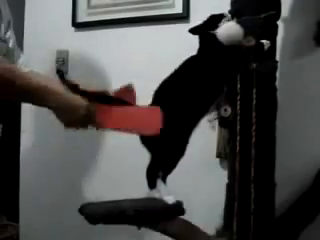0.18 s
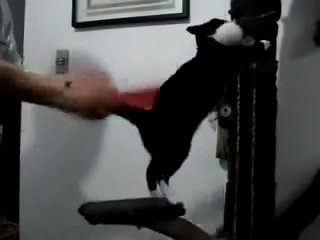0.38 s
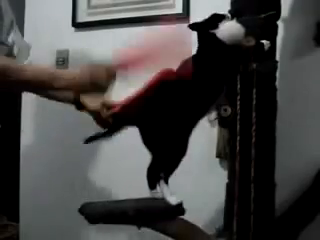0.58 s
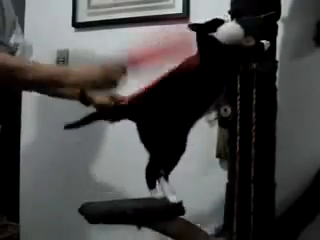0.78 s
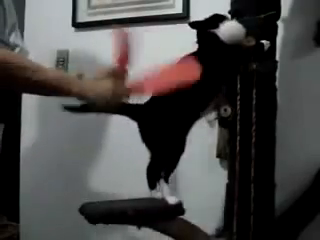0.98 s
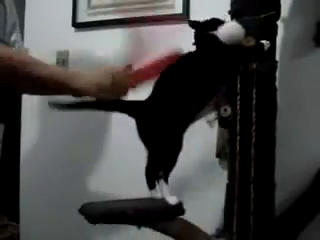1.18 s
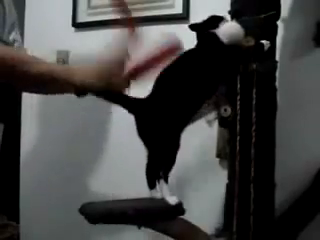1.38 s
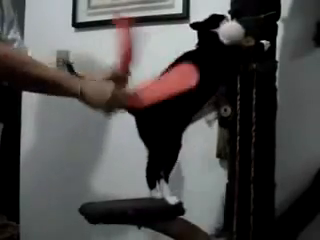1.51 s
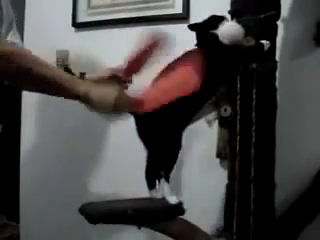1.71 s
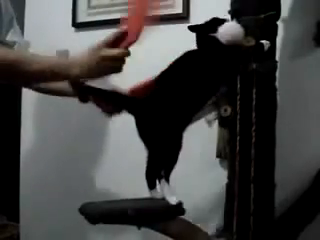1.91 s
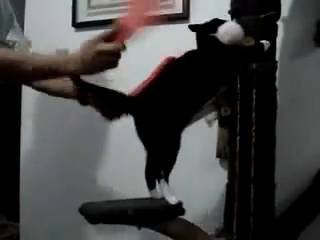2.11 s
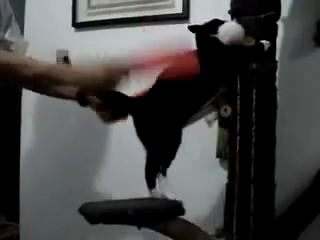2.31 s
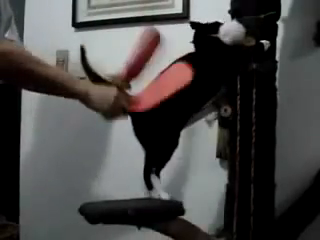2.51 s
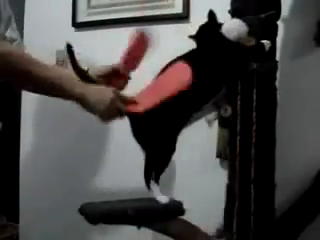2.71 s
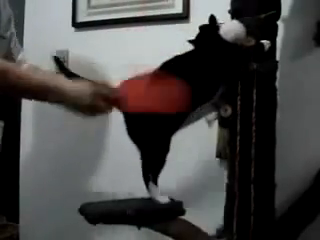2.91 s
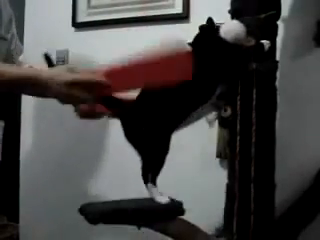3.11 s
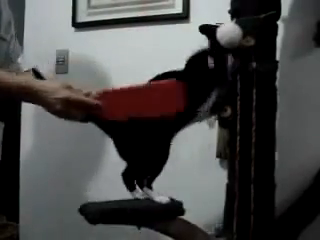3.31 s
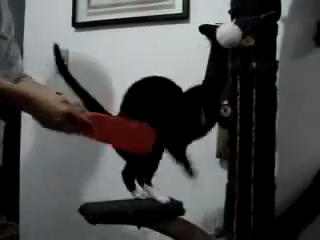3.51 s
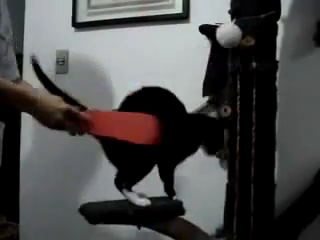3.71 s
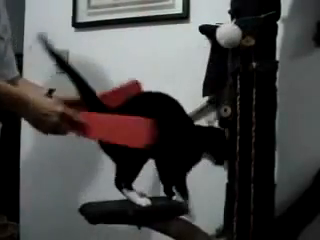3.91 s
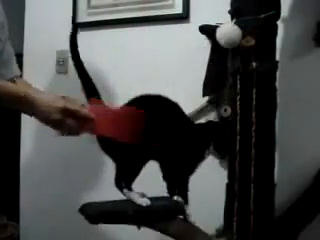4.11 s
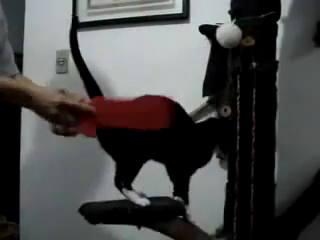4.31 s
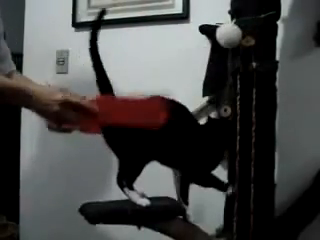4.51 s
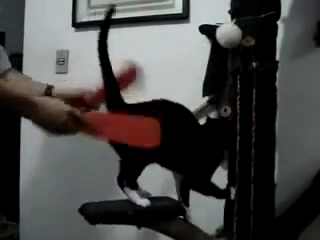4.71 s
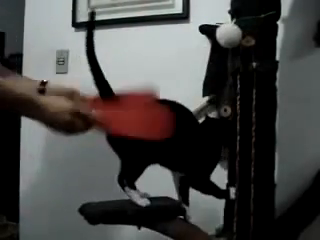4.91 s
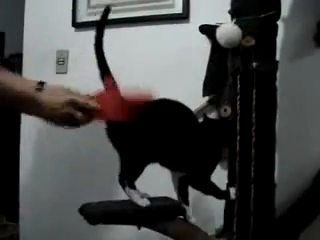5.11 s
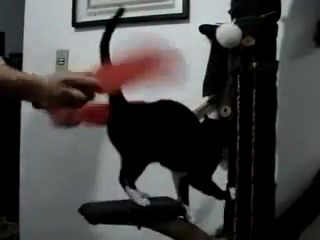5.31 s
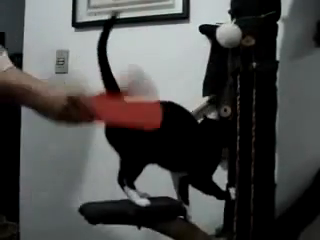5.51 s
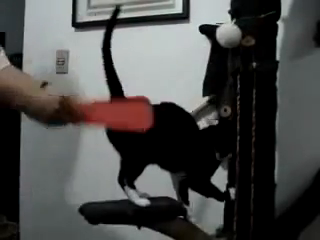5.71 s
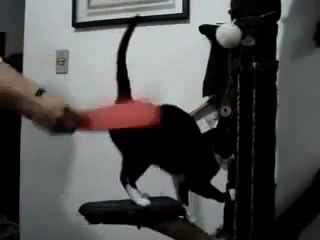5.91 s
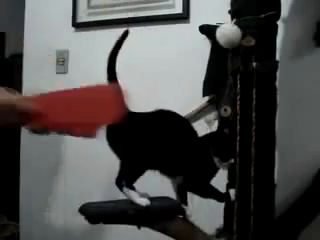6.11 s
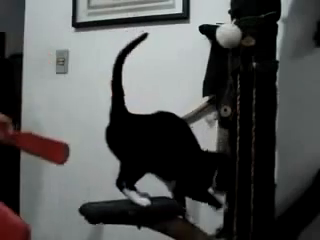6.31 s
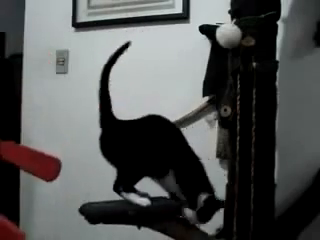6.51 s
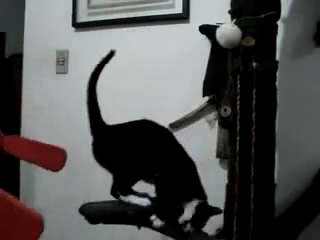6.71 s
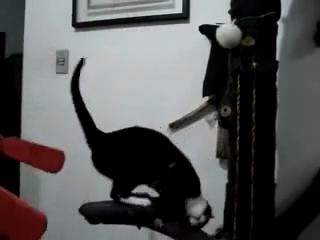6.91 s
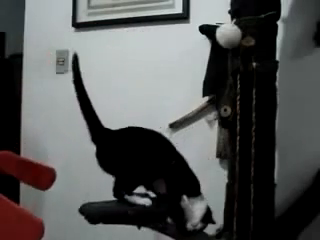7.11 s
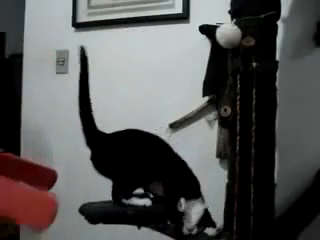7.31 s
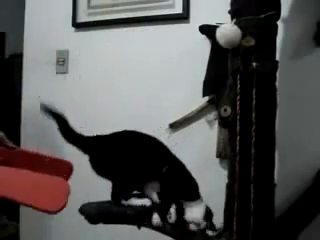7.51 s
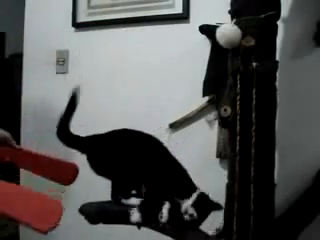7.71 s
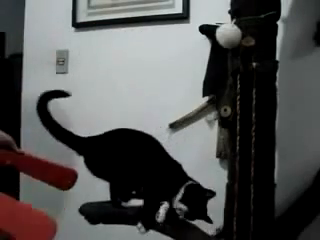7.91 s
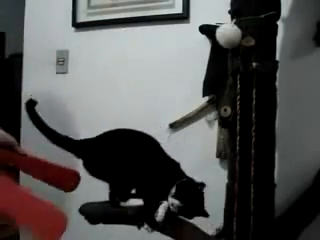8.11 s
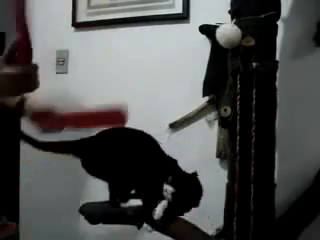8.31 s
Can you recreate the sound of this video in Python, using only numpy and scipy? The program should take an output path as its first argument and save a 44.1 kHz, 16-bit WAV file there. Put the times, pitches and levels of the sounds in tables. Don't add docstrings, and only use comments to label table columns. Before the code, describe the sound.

Two foam paddles pat a cat in quick alternating firm and soft slaps in a bare room, then the cat gives a wavering meow.

```python
import sys
import numpy as np
from scipy import signal
from scipy.fft import rfft, irfft, next_fast_len
from scipy.io import wavfile
from scipy.ndimage import uniform_filter1d

SR = 44100
rng = np.random.default_rng(int(sys.argv[2]) if len(sys.argv) > 2 else 0)


def wav_out(sig):
    wavfile.write(sys.argv[1], SR, np.round(np.clip(np.atleast_2d(sig).T, -1, 1) * 32767).astype(np.int16))


def voltage_ratio(decibels):
    exponent = np.asarray(decibels, float) / 20
    return 10 ** exponent


N = 373527

# [f/Hz, density/dB per Hz]
HISS_SPECTRUM = [(18, -48), (30, -26), (198, -14.5), (272, -11), (410, -7), (1250, -7.5), (3890, -15.5),
                 (5880, -24.5), (7860, -26.5), (9770, -36), (12700, -55), (21500, -120)]
# [t/s, level/dB]
HISS_LEVEL = [(0, -77), (6.3, -79.5), (6.52, -83.5), (6.57, -82.5), (6.7, -79.5), (7.6, -78.5),
              (8.47, -77.5)]
# [f/Hz, T60/s]
ROOM_DECAY = [(100, 0.67), (400, 0.49), (900, 0.38), (2000, 0.37), (5000, 0.33)]
# [t/s, peak level/dB, f/Hz]
PAW_SCUFFS = [
    (8.165, -66.5, 1010),
    (8.364, -70.5, 1560),
    (8.387, -64, 1520),
]
# [t/s, pitch f/Hz, level/dB, effort/dB, jaw opening/0-1]
MEOW_SWELLS = [
    [(6.553, 417, -81, -29, 0.1), (6.6, 483, -73, -19, 0.06), (6.664, 497, -69, -7, .05),
     (6.678, 571.5, -59.5, 2.5, 0.6), (6.85, 495, -69, -2, 0.84), (6.95, 499.6, -64, 6.5, 0.3),
     (7.05, 510.7, -63.5, 8.5, 0), (7.11, 438, -67.5, -10.5, 0.03), (7.2, 353.5, -79.5, -14, .05)],
    [(7.28, 385.6, -77.5, -17, .1), (7.34, 405, -71.5, -18, .1), (7.39, 436, -69, -10, 0.83),
     (7.43, 447.6, -63.5, 1.5, 0.73), (7.52, 453.8, -71, 7.5, 0.7), (7.56, 443, -70, -16, .6),
     (7.62, 419, -78, -20, .1)],
    [(7.7, 459.4, -68, -5, .05), (7.79, 510, -64, -8, 0.6), (7.88, 535, -59, 4.5, .3),
     (7.95, 516.5, -64.5, -2.5, 0.08), (8.04, 493.5, -70.5, -10, 0), (8.065, 430, -66, -9, 0.29),
     (8.095, 381, -86, -4, .2), (8.19, 380, -90, -5, 0.1)],
]
# [f/Hz, width/Hz, level/dB]
MOUTH_MODES = [(3090, 240, -7), (3780, 700, -9)]
# [f/Hz, width/Hz, level/dB]
UPPER_MODES = [(5840, 1300, -6), (6450, 1800, -23)]
# [f/Hz, level/dB, T60/s]
POST_MODES = [(179.8, -24, 0.26), (331.4, -14.5, 0.23), (387.8, -15.5, 0.43)]
# [f/Hz, density/dB per Hz]
SLAP_SPECTRUM = [(24, -71), (40, -49), (69, -41.5), (258, -14), (381, -13.5), (514, -7), (814, -6),
                 (873, -4), (1950, -13), (5130, -33), (9770, -55.5), (12700, -93), (21500, -120)]
# [t/s, peak level/dB, body level/dB, hollow ring f/Hz]
FAR_PATS = [(0.142, -32, -22.5, 880), (0.427, -37, -3.5, 1080), (1.192, -32, -17, 750),
            (1.428, -37.5, -13.5, 630), (1.688, -37.5, -13.5, 1030), (1.929, -37.5, -8.5, 1040),
            (2.19, -32.5, -20, 545), (2.659, -44, -21, 1130), (2.918, -33.5, -20.5, 615),
            (3.148, -35, -30, 597), (3.645, -42, -16, 764), (4.162, -50, -2, 640), (4.391, -46, -27, 1030),
            (4.608, -44.5, -15, 757), (4.89, -40, -11.5, 640), (5.136, -39, -17, 955),
            (5.372, -42.5, -2.5, 929), (5.63, -36, -20, 915), (-.1, -38, -7, 890), (2.42, -40, -6, 880)]
# [t/s, strength level/dB, brightness level/dB, hollow ring f/Hz]
NEAR_SLAPS = [(0.042, -23, -15, 640), (0.301, -25, -21, 970), (0.573, -23, -19, 1200),
              (0.829, -26, -26, 1020), (1.074, -25.5, -22.5, 730), (1.335, -25, -26.5, 750),
              (1.58, -22, -26, 770), (1.836, -22, -29, 1310), (2.08, -23.5, -24.5, 720),
              (2.336, -21.5, -27, 750), (2.575, -22, -25.5, 810), (2.808, -27.5, -22.5, 1250),
              (3.064, -22, -23, 660), (3.307, -23.5, -24.5, 790), (3.545, -24, -15.5, 940),
              (3.802, -26.5, -25.5, 905), (4.037, -29.5, -28, 830), (4.281, -26.5, -22, 1080),
              (4.531, -28.5, -26, 1070), (4.773, -25, -19.5, 820), (5.032, -28, -21.5, 1120),
              (5.284, -25.5, -24, 890), (5.533, -27, -19, 1210), (5.788, -20.5, -13.5, 1050),
              (6.023, -32.5, -43.5, 606), (6.042, -21, -21.5, 976)]


def unit(x):
    return x / np.sqrt(np.mean(x ** 2))


def wobble(size, span):
    drift = uniform_filter1d(rng.standard_normal(size), size=span)
    return unit(uniform_filter1d(drift, size=span))


def colour(hz, points):
    f, db = np.transpose(points)
    return voltage_ratio(np.interp(np.log(hz + 1), np.log(f), db))


def modes(hz, table):
    return sum(voltage_ratio(db) / (1 + ((hz - f) / (width / 2)) ** 2) for f, width, db in table)


def causal(gain):
    cep = irfft(np.log(gain + 1e-9))
    half = len(cep) // 2
    cep[1:half] *= 2
    cep[half + 1:] = 0
    return np.exp(rfft(cep))


def echoes(size):
    fill_s, first, scatter_s = 0.009, 0.45, 0.061
    t, hz = np.arange(size) / SR, np.fft.rfftfreq(size, 1 / SR)
    scatter_db = 4.46 * rng.standard_normal(size // 64).repeat(64) * np.exp(-t / scatter_s)
    noise, out = rfft(rng.standard_normal(size)), 0
    centres = np.log([f for f, _ in ROOM_DECAY])
    for k, (_, t60_s) in enumerate(ROOM_DECAY):
        share = np.interp(np.log(hz + 1), centres, np.arange(len(centres)) == k)
        out = out + irfft(noise * share, size) * voltage_ratio(-60 * t / t60_s)
    out = out * voltage_ratio(scatter_db) * (1 - (1 - first) * np.exp(-(t / fill_s) ** 2))
    return out / np.sqrt(np.sum(out ** 2))


def hiss():
    t, size = np.arange(N) / SR, next_fast_len(N)
    spectrum = colour(np.fft.rfftfreq(size, 1 / SR), HISS_SPECTRUM)
    air = unit(irfft(rfft(rng.standard_normal(size)) * spectrum, size)[:N])
    rumble = signal.sosfilt(signal.butter(2, 450, fs=SR, output="sos"), air)
    air = air - 0.97 * rumble * (t < 6.55)
    whine = voltage_ratio(-27) * np.sin(2 * np.pi * 8123 * t + 0.3 * wobble(N, span=900))
    return voltage_ratio(np.interp(t, *np.transpose(HISS_LEVEL))) * (air + whine)


def paws():
    out, t = np.zeros(N + 4096), np.arange(4096) / SR
    decay = 0.5 * np.exp(-t / 0.009) + 0.2 * np.exp(-t / 0.05)
    for s, db, hz in PAW_SCUFFS:
        band = signal.butter(2, [0.44 * hz, 1.42 * hz], "band", fs=SR)
        burst = unit(signal.lfilter(*band, rng.standard_normal(4096)))
        i = int(s * SR)
        out[i:i + 4096] += voltage_ratio(db) * burst * decay
    return out[:N]


def meow():
    s, *columns = np.transpose(np.concatenate(MEOW_SWELLS))
    t = np.arange(int(s[0] * SR), N) / SR
    pitch_hz, low_db, effort_db, jaw = (np.interp(t, s, c) for c in columns)

    nose_db = 20 * np.log10(1 + modes(pitch_hz, [(405, 50, 12)]))
    one_db = low_db - 15 - 0.37 * effort_db + nose_db
    phase = 2 * np.pi * np.cumsum(pitch_hz * (1 + 0.0043 * wobble(len(t), span=200))) / SR
    second_third = np.sin(2 * phase) + voltage_ratio(-6.0) * np.cos(3 * phase)
    voice = voltage_ratio(one_db) * np.sin(phase) + voltage_ratio(low_db) * second_third

    mouth_hz, mouth_wide_hz = 2000 + 260 * jaw, 240 + 400 * jaw
    mouth_db = low_db + effort_db
    open_db = mouth_db - 37 + 35.5 * jaw
    top_db = low_db - 28 + 0.07 * effort_db + 8 * jaw
    lips = [(mouth_hz, mouth_wide_hz, 0), (2660, 130, -6.5)]
    # modes, harmonic numbers, level/dB, breath/0-1, fall/dB per octave above the first mode
    bands = ((lips, np.arange(3, 7), mouth_db, 0, 21.0),
             (MOUTH_MODES, np.arange(6, 11), open_db, 0.3, 18.0),
             (UPPER_MODES, np.arange(10, 16), top_db, 0.6, 1.5))
    patchy_db = 7.5
    for table, orders, db, breath, fall_db in bands:
        hz = orders[:, None] * pitch_hz
        octaves = np.clip(np.log2(hz / table[0][0]), 0, 2)
        gains = modes(hz, table) * voltage_ratio(-fall_db * octaves)
        gains = gains / np.sqrt(np.sum(gains ** 2, axis=0))
        drift = np.array([wobble(len(t), span=1500) for _ in orders])
        gains = gains * voltage_ratio(patchy_db * breath * drift)
        smear = 1 + breath * wobble(len(t), span=50)
        voice = voice + voltage_ratio(db) * smear * np.sum(gains * np.sin(orders[:, None] * phase), axis=0)

    voice_break = 0.2 * np.exp(-((t - 6.675) / 0.021) ** 2)
    croak = 8 * np.clip(t - 8.02, 0, 1)
    rasp = np.clip(0.071 + voice_break + croak, 0, 1) * wobble(len(t), span=70)
    fade_in, fade_out = np.clip((t - s[0]) / 0.006, 0, 1), np.clip((s[-1] - t) / 0.023, 0, 1)
    voice = voice * (1 + rasp) * fade_in * fade_out
    wet = signal.fftconvolve(voice, echoes(32768))[:len(t)]
    return np.pad(voltage_ratio(2.0) * voice + voltage_ratio(-0.5) * wet, (N - len(t), 0))


def paddle(blows, same, trim_db, room_db, dull_db, ring_db, thump_db, contact_s, size=24576):
    out, t, hz = np.zeros(N + 2 * size), np.arange(size) / SR, np.fft.rfftfreq(size, 1 / SR)
    spots = [echoes(size), echoes(size)]
    post = sum(voltage_ratio(db - 29.0 - 60 * t / t60_s) * np.sin(2 * np.pi * f * t) for f, db, t60_s in POST_MODES)
    walls = colour(hz, [(1500, 0.0011), (5000, dull_db)])
    fur = causal(colour(hz, [(4800, 2.0), (6500, 0.5)]))
    for s, db, bright_db, body_db, ring_hz, wet_db in blows:
        tone = colour(hz, [(250, 0.5 * (body_db + 14.5)), (700, 0.0077), (1500, 0.004),
                           (3000, 0.94 * (bright_db + 18.5)), (8000, 0.15 * (bright_db + 3.5))])
        ring = 2.5 + modes(hz, [(ring_hz, 330, ring_db)])
        push = causal(colour(hz, SLAP_SPECTRUM) * tone * ring)
        push = -push / np.abs(irfft(push)).max()
        shoulders = 0.7 < s < 2.7
        path = np.sqrt(same) * spots[shoulders] + np.sqrt(1 - same) * echoes(size)
        path = path + voltage_ratio(-6.0 * shoulders) * post
        landing = 0.13 * rng.standard_normal(1024) * np.exp(-t[:1024] / contact_s)
        landing[0] = 1
        direct = rfft(landing, size) * fur
        direct = direct / np.abs(irfft(push * direct)).max()
        blow = irfft(push * (direct + voltage_ratio(room_db + wet_db) * walls * rfft(path)))
        swell = rng.standard_normal(256) * np.linspace(0, 1, num=256) ** 2
        lead = irfft(push * rfft(swell, size))
        blow = np.roll(blow, shift=256) + voltage_ratio(-29.0) * lead
        blow[256:456] += voltage_ratio(thump_db + 0.5 - 7.7 * shoulders) * np.hanning(200)
        i = size + int(s * SR) - 240
        out[i:i + size] += voltage_ratio(db + trim_db) * blow
    return out[size:size + N]


def far_paddle():
    pats = []
    for s, db, body_db, ring_hz in FAR_PATS:
        wet_db = 1 - 0.3 * (db + 36.5)
        pats.append((s, db, -31.5, body_db, ring_hz, wet_db))
    return paddle(pats, 0.57, trim_db=4.5, room_db=1.5, dull_db=5.0, ring_db=6.5, thump_db=-52, contact_s=0.0048)


def near_paddle():
    slaps = []
    for s, db, bright_db, ring_hz in NEAR_SLAPS:
        crack_db = -24.5 + 0.27 * (db + 25.0)
        body_db = -27 - 0.5 * (db + 26.0)
        slaps.append((s, crack_db, bright_db, body_db, ring_hz, db - crack_db))
    return paddle(slaps, 0.46, trim_db=0.0, room_db=4.5, dull_db=-2.5, ring_db=1.0, thump_db=-31, contact_s=0.0016)


def scene():
    mono = hiss() + paws() + meow() + far_paddle() + near_paddle()
    return np.array([mono, mono])


def low_pass(x):
    return signal.sosfilt(signal.butter(12, 9920, fs=SR, output="sos"), x)


def record(dry):
    slot_s, slot_at_s, hush_ends_s, hush_full_s = 0.036, 0.002, 0.0048, 0.027
    hush, last = np.zeros(N), 0
    for s, *_ in NEAR_SLAPS:
        start = max(s - (s - slot_at_s) % slot_s, last)
        depth = (start > last) * min((s - start) / hush_full_s, 1) ** 2
        hush[int(start * SR):int((s - hush_ends_s) * SR)] = depth
        last = s
    bass_gain = voltage_ratio(uniform_filter1d(-10 * hush, size=130))
    treble_gain = voltage_ratio(uniform_filter1d(-18 * hush, size=130))
    bass = signal.sosfiltfilt(signal.butter(4, 1400, fs=SR, output="sos"), dry[0])
    x = bass * bass_gain + (dry[0] - bass) * treble_gain
    x = 0.093 * np.tanh(x / 0.099)
    x = signal.sosfilt(signal.ellip(8, 0.2, 70, 9900, fs=SR, output="sos"), x)
    left_right_db = np.array([[0], [-25.6]])
    return low_pass(voltage_ratio(5.6) * x * voltage_ratio(left_right_db))


dry = scene()
out = record(dry)
wav_out(out)
```